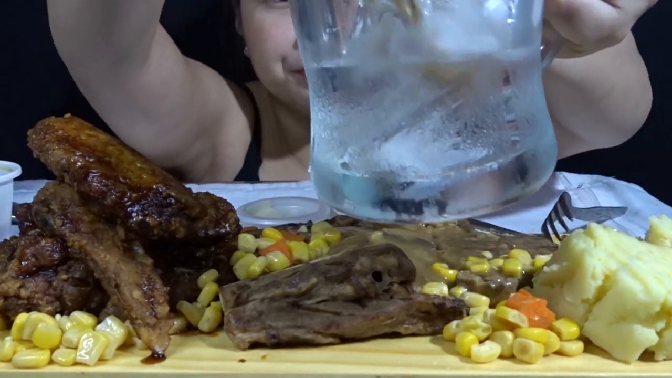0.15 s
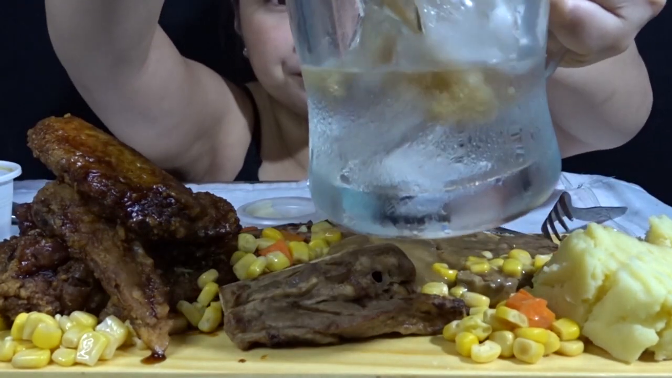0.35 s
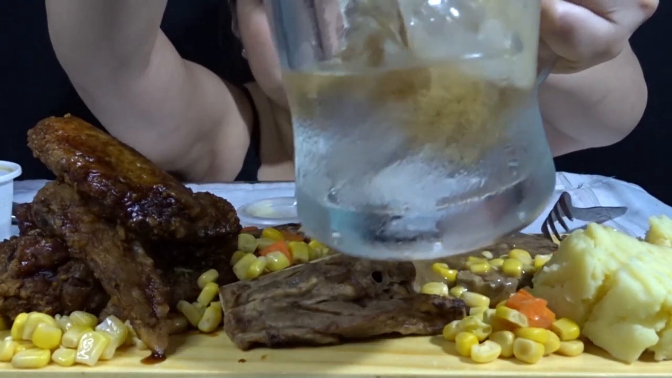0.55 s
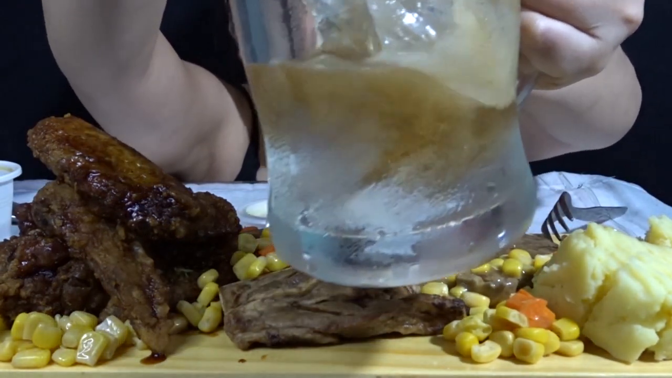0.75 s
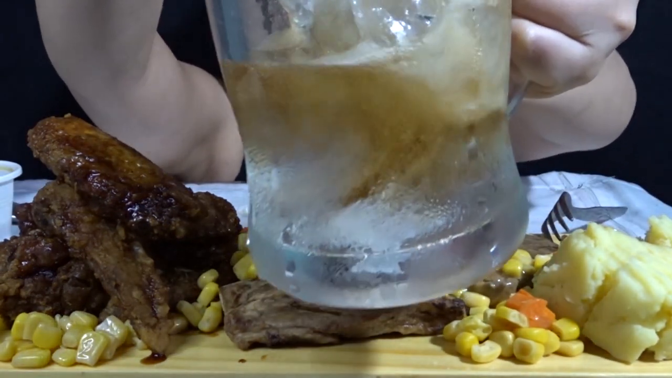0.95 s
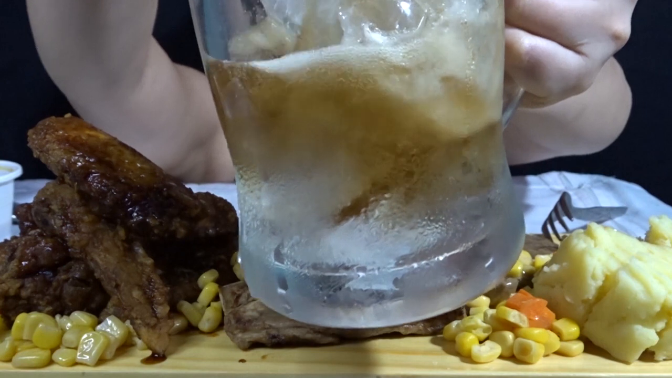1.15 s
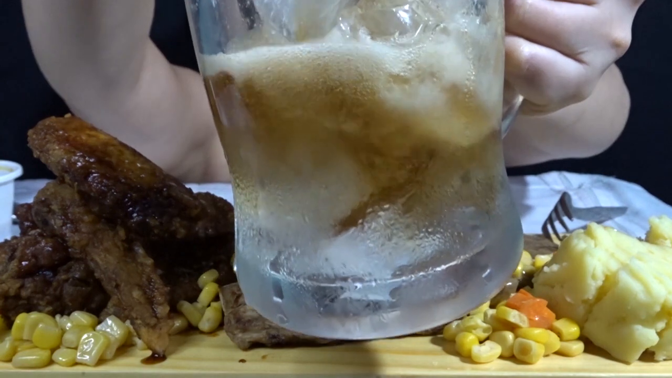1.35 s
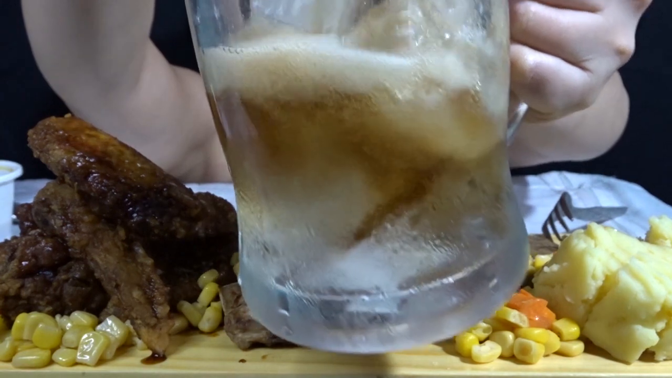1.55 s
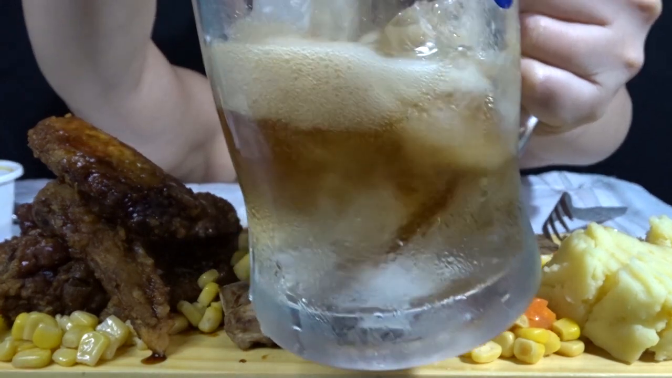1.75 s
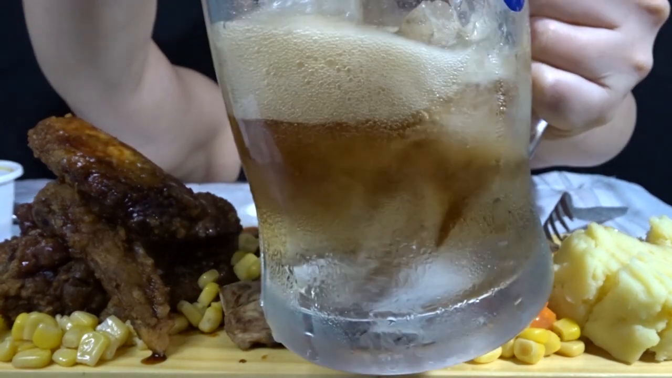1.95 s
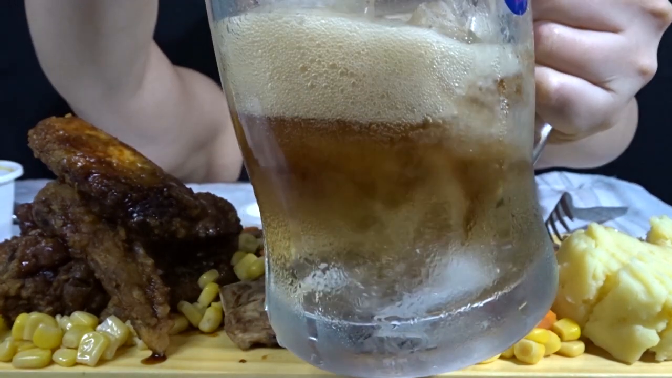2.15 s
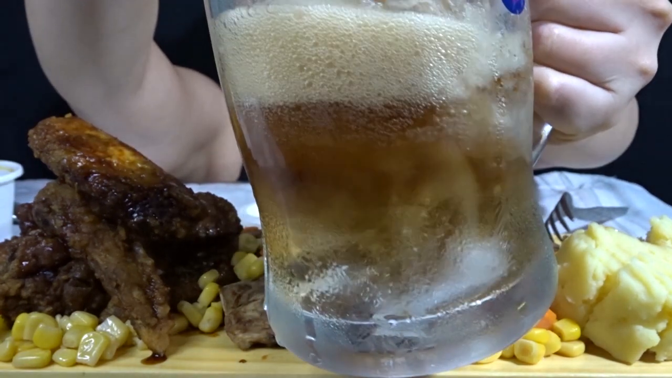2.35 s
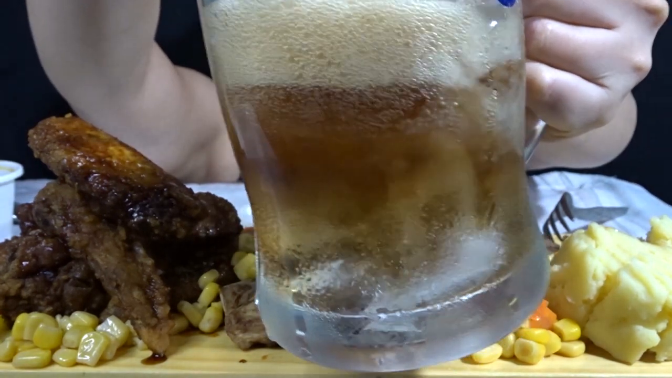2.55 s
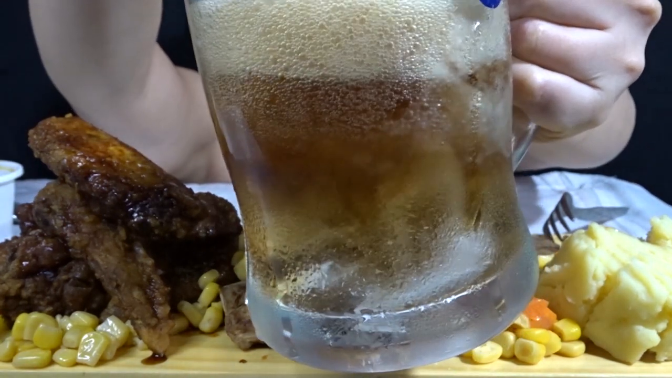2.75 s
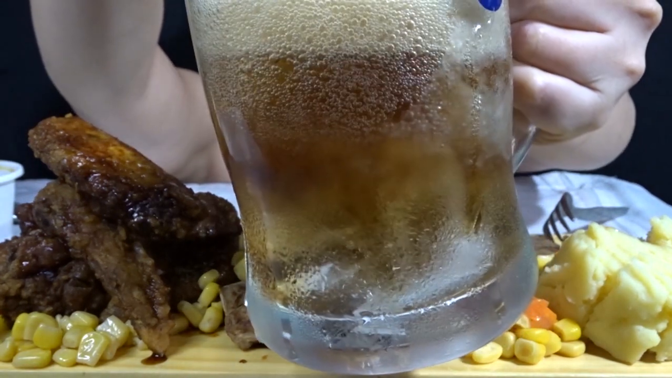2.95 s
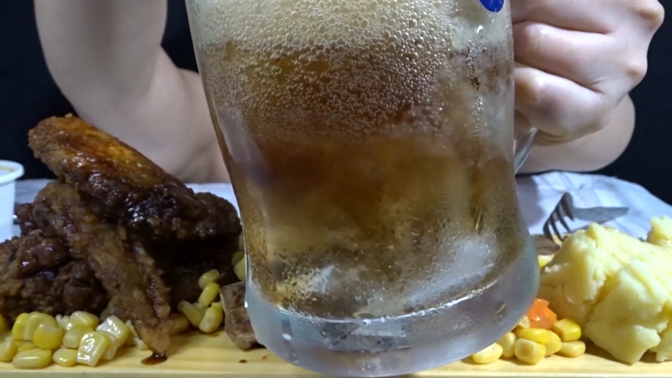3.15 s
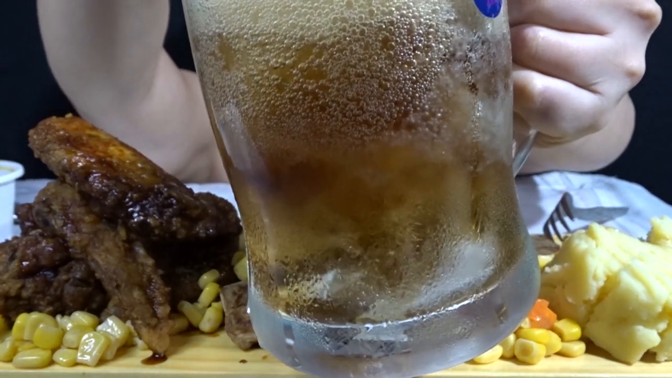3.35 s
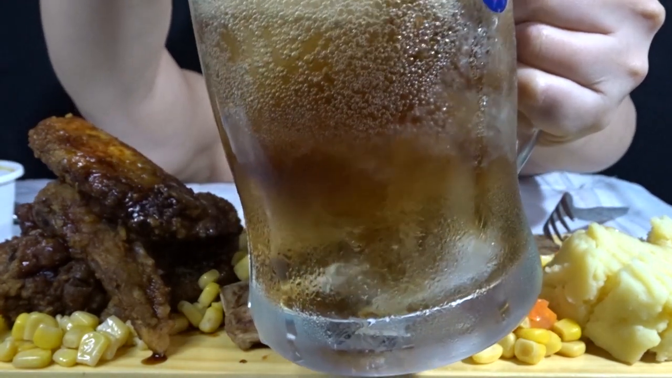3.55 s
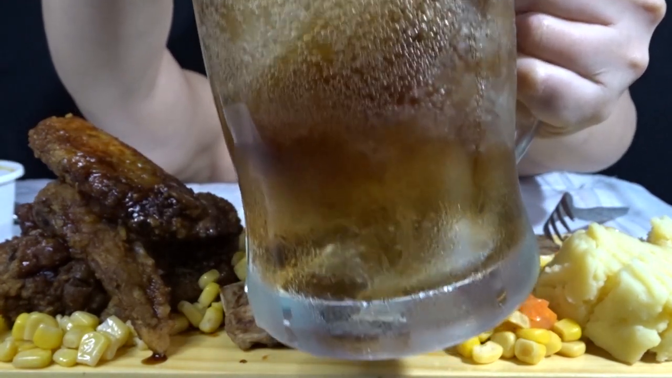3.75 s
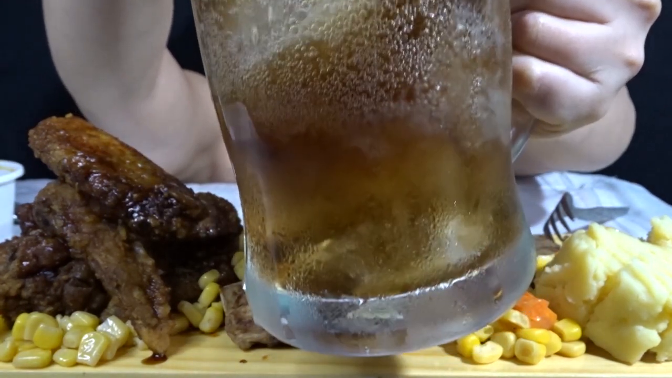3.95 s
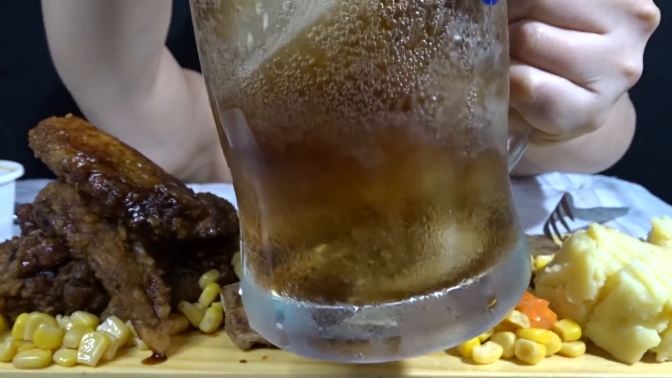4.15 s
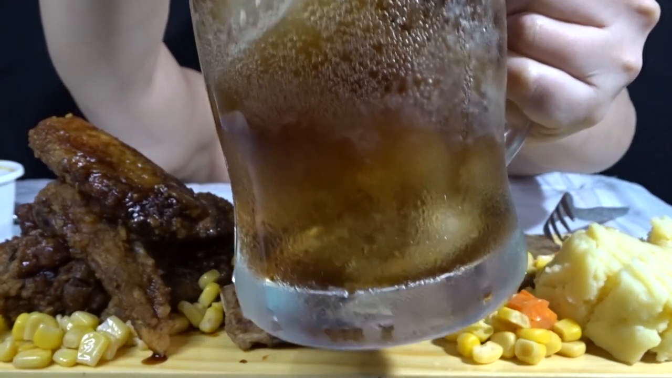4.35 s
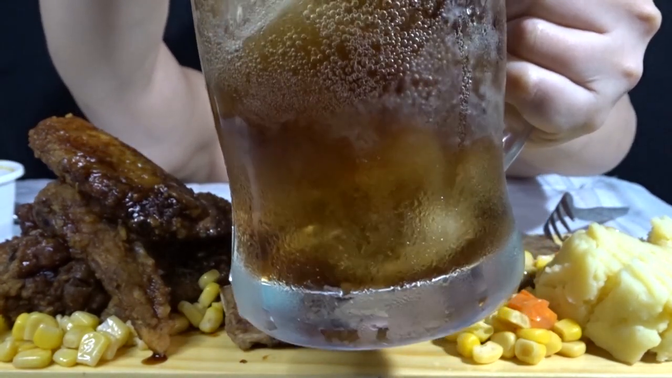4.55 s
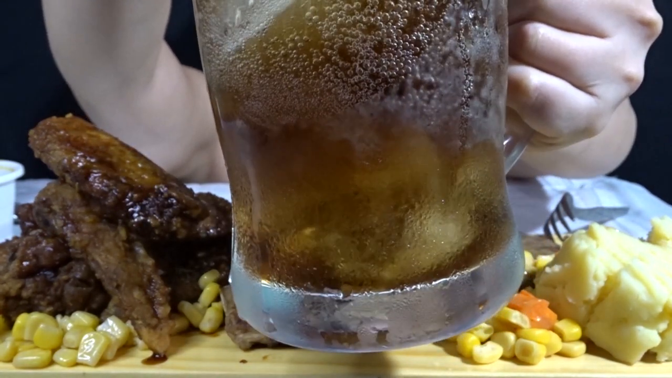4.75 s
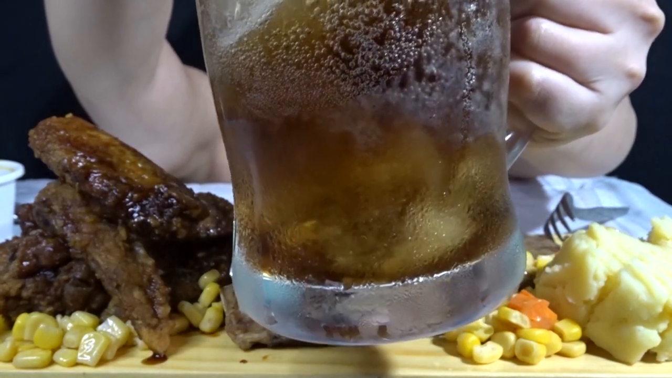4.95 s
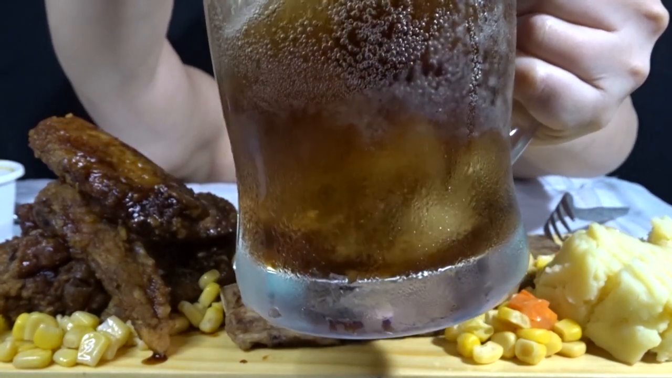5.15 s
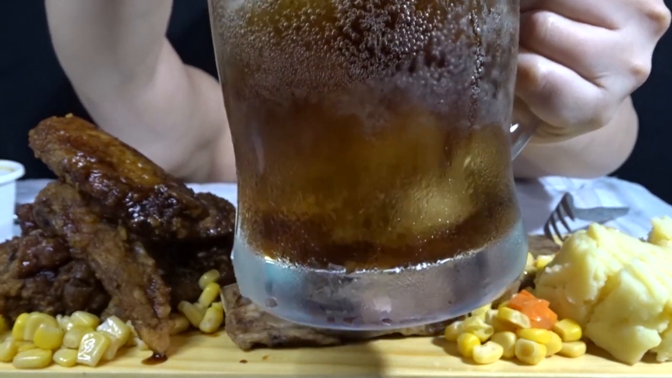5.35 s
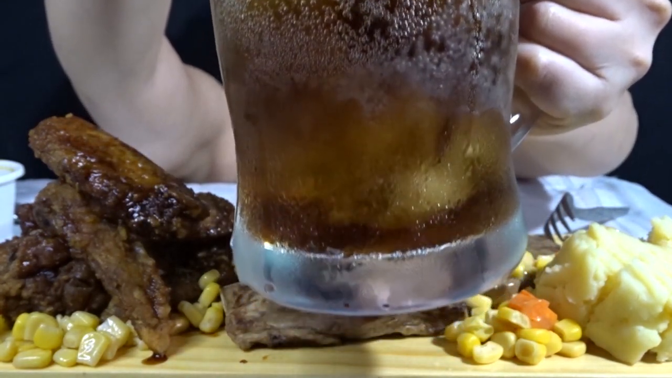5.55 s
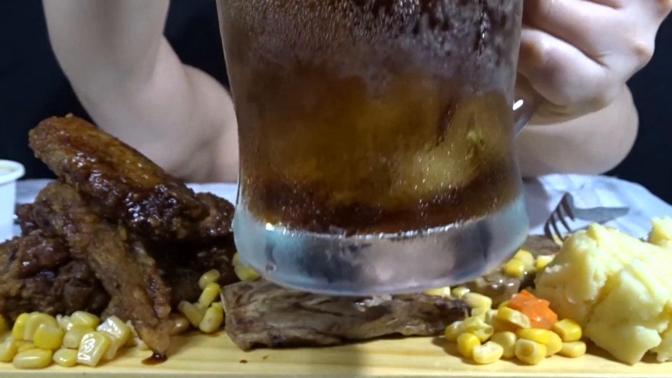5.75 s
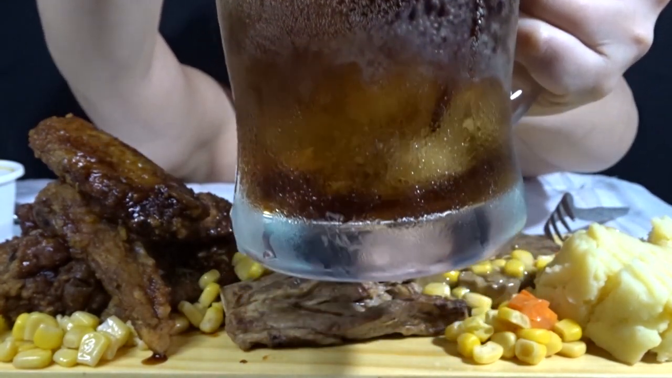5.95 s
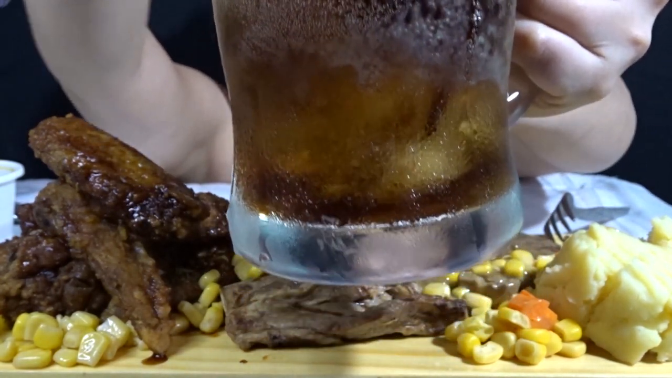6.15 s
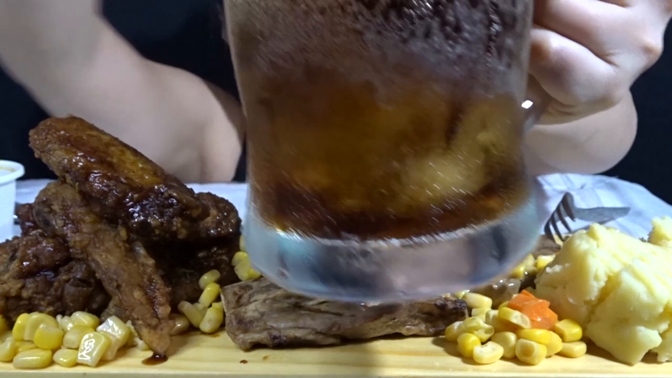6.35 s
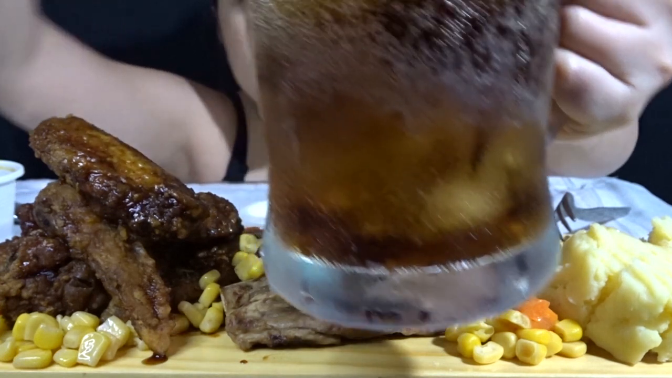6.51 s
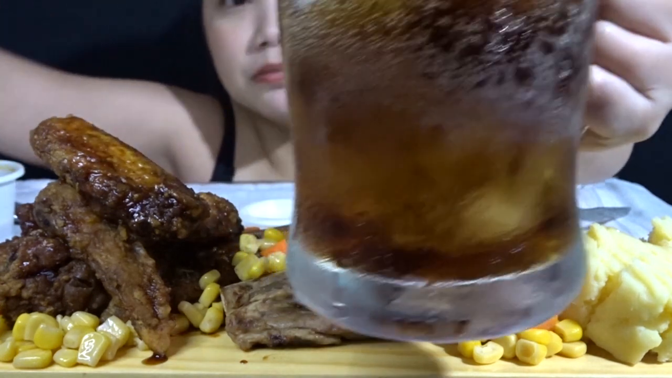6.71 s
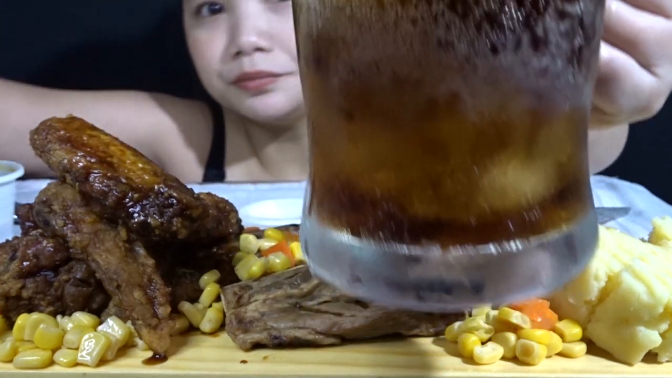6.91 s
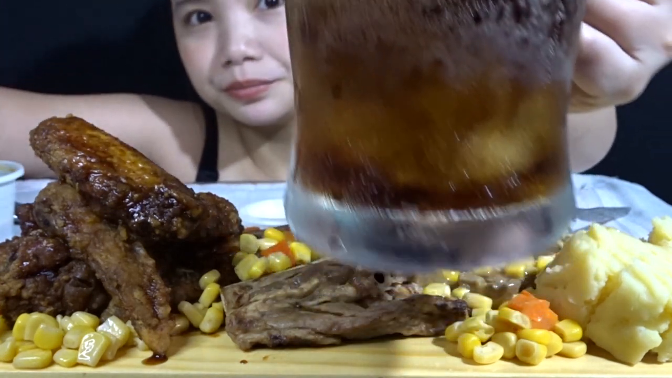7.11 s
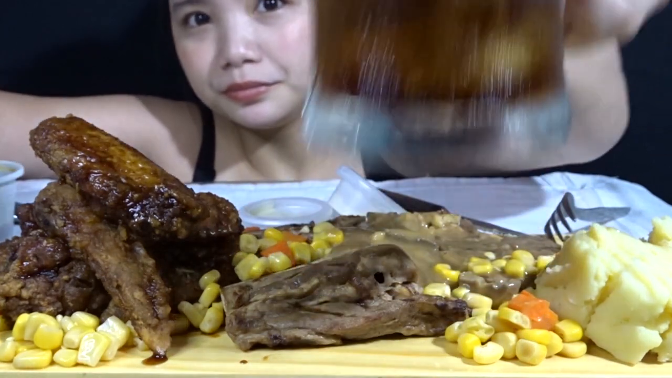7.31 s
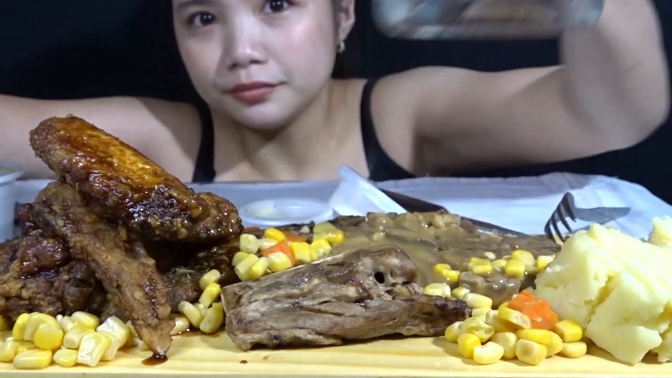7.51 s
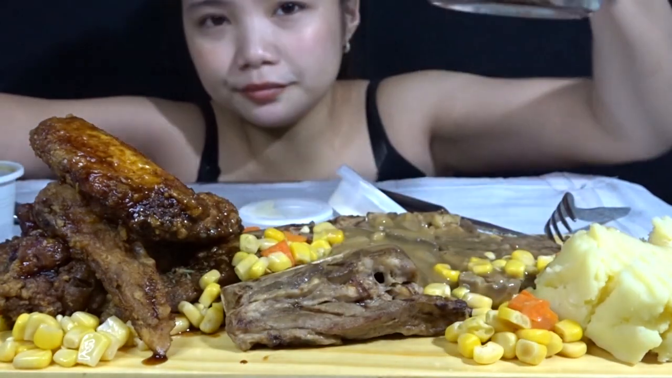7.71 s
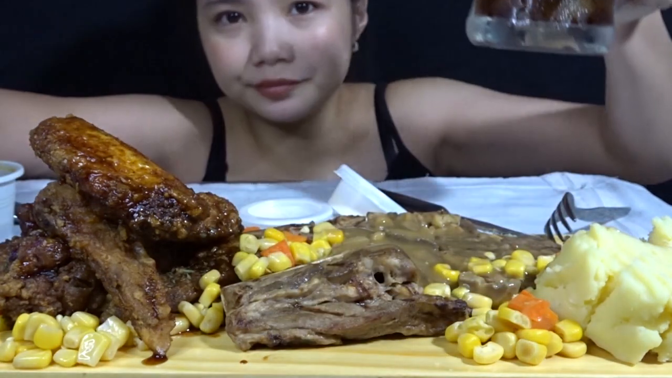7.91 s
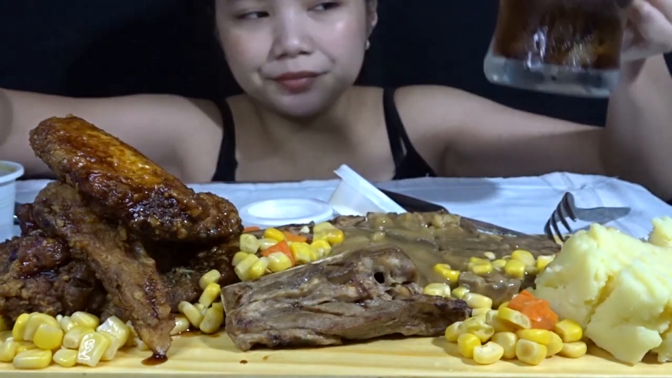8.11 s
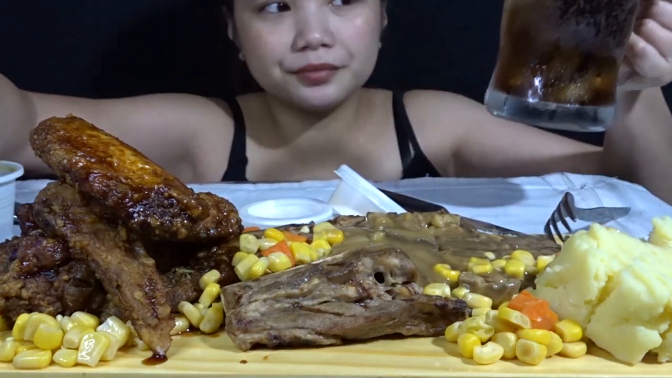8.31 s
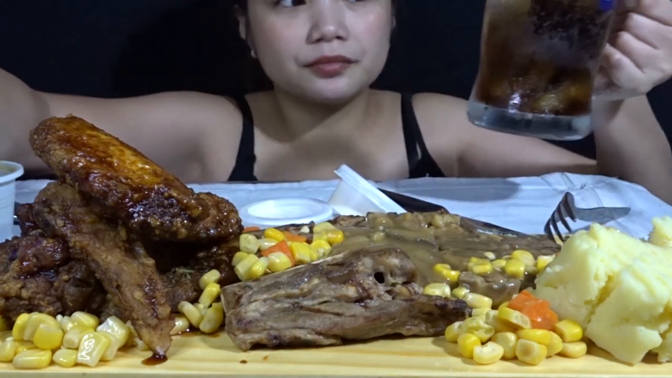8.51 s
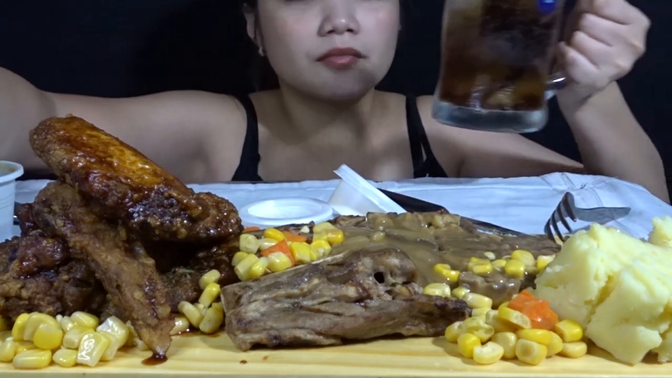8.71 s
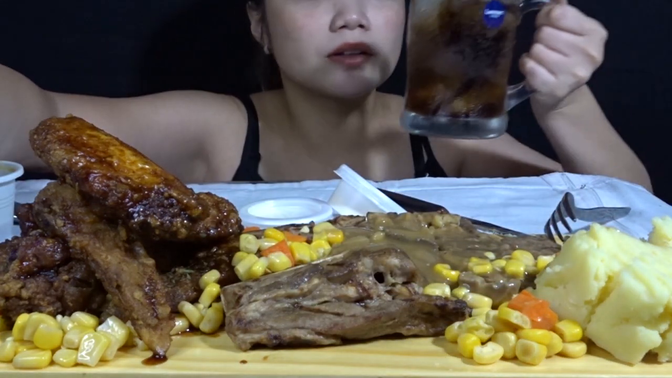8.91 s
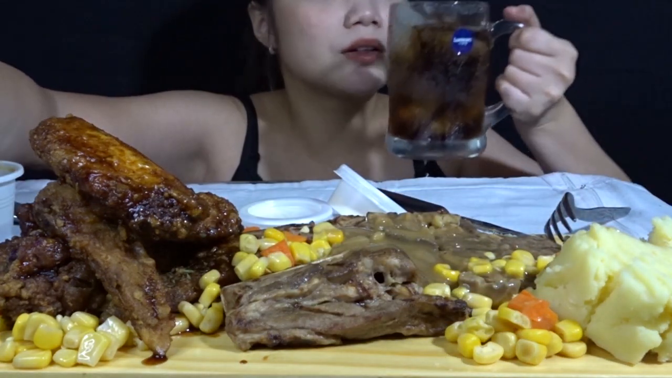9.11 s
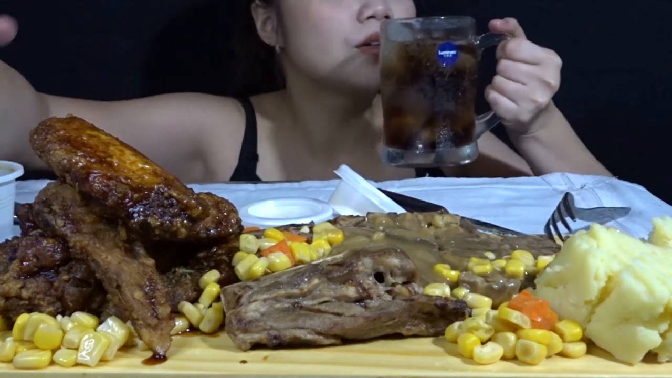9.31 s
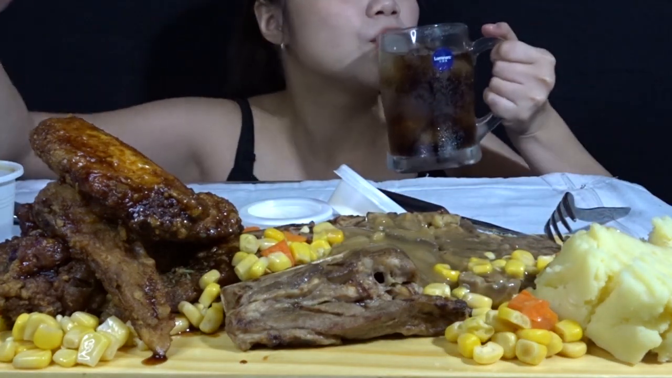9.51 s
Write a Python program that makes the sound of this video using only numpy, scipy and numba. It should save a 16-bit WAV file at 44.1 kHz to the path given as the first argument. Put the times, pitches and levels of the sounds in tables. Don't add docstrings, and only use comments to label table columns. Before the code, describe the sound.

A quiet indoor room with faint background noise, miked very close in stereo. From 0 to 0.3 s weak fizz, tiny ice ticks and first drops plink. From 0.3 to 1 s splashes, bubbly plinks and ice cracks crowd together while thin crackling foam thickens into a full, bright hiss. From 1 to 6.4 s the hiss stays dense and nearly steady, its hollow mug resonance climbing until about 4.6 s. Short glassy ice knocks come at about 1.6, 3.5, 4.5, 4.9, a strong one at 5.3, and 6.2 s, over very faint low gurgles. From 6.4 s the fizz weakens slightly; at 7.3-7.9 s ice clinks in a cluster as the mug is lifted, and the hiss falls steeply, leaving airy treble. Around 8.5-8.8 s a soft flurry of ice taps sounds, then sparse faint ticks and nearly vanished fizz until 9.7 s.

```python
import sys
import numpy as np
from scipy import signal
from scipy.fft import rfft, irfft, next_fast_len
from scipy.io import wavfile
from scipy.ndimage import map_coordinates
from numba import njit

SR = 44100
rng = np.random.default_rng(int(sys.argv[2]) if len(sys.argv) > 2 else 0)


def undo_db(level):
    steps = np.asarray(level, float) / 20
    return 10 ** steps


def wav_record(signal):
    frames = np.transpose(np.atleast_2d(signal))
    bounded = np.clip(frames, -1, 1)
    quanta = np.round(bounded * 32767).astype(np.int16)
    wavfile.write(sys.argv[1], SR, quanta)


N = 426447

# freq_hz, density_db_per_hz
ROOM_COLOUR = [(15, -76), (25, -25), (173, -27), (399, -5.5), (567, 0), (703, -2), (895, -2), (1050, -1),
               (1380, -4.5), (1570, 3), (1950, 0.5), (2630, -23.5), (7500, -27.5), (15500, -37)]
# freq_hz, likeness_0_to_1
ROOM_LIKENESS = [(60, 0.15), (130, 0.36), (290, 0.94), (640, 0.15), (1410, 0.03), (3100, 0.25),
                 (6820, 0.08), (15000, 0.083)]
# time_s, level_db
FOAM_LEVEL = [(0.0, -49.5), (0.19, -49.5), (0.32, -45), (0.46, -37), (0.67, -31.5), (0.86, -29.5),
              (2.39, -29.5), (3.61, -28.5), (4.31, -29), (5.49, -29), (6.44, -31), (7.33, -32), (7.62, -40),
              (8.0, -47.5), (8.56, -48.5), (8.74, -51.5), (8.86, -53.5), (9.67, -57)]
# time_s, lowest_resonance_hz, lowest_level_db, second_gain_db
AIR_SPACE = [(0, 1030, -75, 5), (.37, 1060, -57, 4), (.5, 1100, -35.5, 4), (.58, 1100, -44.5, 0.5),
             (.86, 1105, -42, 3), (.97, 1215, -45.5, 4.5), (1.3, 1260, -36.5, 2), (1.6, 1323, -38.5, 2.5),
             (2.7, 1520, -37.5, 5.5), (3.6, 1690, -36.5, 4.5), (4.6, 2010, -45.5, 1),
             (5.4, 1980, -44.5, 2.5), (6.3, 1990, -49.5, 0), (7.3, 1950, -42.5, 4.5), (7.9, 2080, -64, 4),
             (8.35, 2020, -66, 4.5), (8.8, 2130, -75, -0.5), (9.67, 2000, -64, 3.5)]
# freq_hz, density_db_per_hz
FOAM_COLOUR = [(410, -53), (700, -23), (776, -29), (943, -30), (1290, -12.5), (2050, -11), (2490, -1),
               (2990, -4.5), (3320, -1.5), (6590, -12), (9470, -15), (15500, -37)]
# freq_hz, density_db_per_hz
MIST_COLOUR = [(3000, -13), (5500, 9.5), (8000, -3.5), (10000, 11.5), (11000, -10)]
# freq_hz, likeness_0_to_1
DRINK_LIKENESS = [(60, 0.07), (130, 0.28), (290, 1), (640, 0.7), (1410, 0.87), (3100, 0.97), (5000, 0.77),
                  (6820, 0.74), (15000, 1)]
# start_s, peak_db, pitch_hz,
# second_pitch_hz
SPLASHES = [(.005, -50, 1980, 4400), (.14, -44, 6700, 1700), (.192, -33, 3600, 3900),
            (.231, -44, 5430, 1350), (.253, -33, 1560, 1980), (.266, -35, 1570, 2450),
            (.378, -24.5, 1180, 1850), (.3825, -25.5, 2100, 2510), (.3845, -30, 3400, 2900),
            (.494, -29, 1280, 950), (.5085, -25, 1750, 1110), (.526, -16, 4280, 1920),
            (.527, -17, 4780, 6500), (.572, -22, 3930, 3420), (.589, -27, 2170, 2520),
            (.6245, -28.5, 1320, 2300), (.706, -25, 5500, 7200), (.742, -18, 3420, 2630),
            (8.6856, -28, 3700, 4300), (8.703, -28, 3700, 4300)]
# start_s, peak_db, pitch_hz, length_ms
DROPS = [(.150, -33, 3150, 1.3), (.157, -37, 4480, 1.4), (0.17, -30, 2460, 2.3), (.188, -25, 3400, 2.3),
         (0.209, -30, 4470, 1.5), (.2235, -37, 1310, 3.9), (.28, -36, 1220, 3.3), (.305, -19, 1910, 3.4),
         (.319, -41, 1900, 4.0), (.333, -37, 1960, 5.6), (0.403, -32, 1050, 4.9), (0.425, -24, 2350, 1.5),
         (.391, -37, 1110, 8.0), (.435, -43, 1070, 9.0), (0.458, -32.5, 1025, 8.8), (0.473, -35, 1035, 9.2),
         (0.4902, -24.5, 2450, 3.6), (0.504, -27, 1540, 5.3), (.554, -19.5, 2360, 3),
         (0.624, -20, 3880, 1.0), (0.663, -18.5, 3670, 0.72), (.683, -14, 4360, .95),
         (.696, -17, 2370, 1.5), (.718, -20.5, 3800, 2.9), (.782, -20, 5040, 1.2), (.880, -18.5, 1940, 2.1),
         (.89, -19, 2490, 3), (0.957, -30.5, 1166, 7.5), (.969, -32, 1150, 6.2)]
# start_s, peak_db
CRACKS = [(.1362, -37), (.1405, -44), (.146, -46), (.1505, -40), (.157, -41), (.1687, -36), (.1861, -32),
          (.198, -38), (.207, -37), (.215, -39), (.224, -39), (.2535, -38), (.266, -38), (.281, -40),
          (.3034, -33), (.331, -39), (.3488, -40), (0.379, -32), (.3825, -35), (.393, -36), (.404, -37),
          (.4245, -33), (.458, -34), (.49, -32), (0.5105, -26), (.526, -18), (.554, -26), (.583, -25),
          (0.623, -18), (.683, -22), (.706, -26), (.742, -20), (.783, -26), (1.603, -29), (3.532, -17),
          (4.854, -19), (5.286, -26), (7.4565, -25), (7.7324, -30), (7.8121, -33), (7.8959, -32),
          (7.988, -34), (8.006, -30), (8.526, -39), (8.533, -39), (8.576, -33), (8.6093, -36),
          (8.6852, -25), (8.702, -34), (8.7075, -31), (8.9315, -44), (8.969, -46), (9.0832, -44),
          (9.128, -48), (9.3546, -40), (9.372, -46), (9.4883, -43)]
# start_s, peak_db, pitch_hz, low_push_db
FILLING_KNOCKS = [(.496, -36, 1390, -41), (1.307, -31, 2710, -60), (1.602, -27, 1230, -29),
                  (1.604, -29, 2710, -55), (1.616, -45, 1500, -36.5), (2.74, -29, 5660, -60),
                  (3.463, -20, 6610, -50), (3.531, -23, 2110, -36), (3.704, -32, 2670, -55),
                  (4.449, -18, 6240, -65), (4.495, -29.5, 1250, -53), (4.854, -28, 1990, -42),
                  (5.2572, -14, 2650, -35), (5.271, -40, 2380, -48), (5.858, -27, 2170, -60),
                  (6.202, -23, 3330, -44), (6.21, -26, 3400, -60)]
# start_s, peak_db, pitch_hz, low_push_db
CARRIED_KNOCKS = [(7.296, -27, 3420, -45), (7.341, -18, 4000, -45), (7.442, -23, 3400, -38),
                  (7.456, -19.5, 2400, -50), (7.462, -22, 2600, -60), (7.473, -41, 1890, -46),
                  (7.572, -34, 1840, -50), (7.608, -23, 3840, -45), (7.72, -41, 2610, -45),
                  (7.733, -32, 1950, -56), (7.813, -32.5, 2600, -47.5), (7.8388, -29, 3160, -63),
                  (7.891, -55, 2870, -48), (8.143, -49, 2110, -54), (8.243, -33, 3700, -70),
                  (8.5265, -40, 4570, -70), (8.532, -44, 2500, -70), (8.576, -40, 5000, -70),
                  (8.609, -37, 2600, -55), (8.655, -37, 2520, -70), (8.663, -36, 2450, -70),
                  (8.696, -33, 2500, -47.5), (8.7065, -32, 2300, -60), (8.717, -43, 2600, -52),
                  (8.735, -50, 2400, -54), (8.76, -47, 2200, -64), (8.703, -30, 2500, -64),
                  (8.869, -46, 2480, -75), (8.932, -42, 4050, -75), (8.961, -45, 2280, -68),
                  (8.975, -50, 2300, -75), (8.993, -52, 2300, -75), (9.084, -45, 2400, -73),
                  (9.088, -48, 2300, -75), (9.288, -42.5, 2260, -51), (9.355, -36.5, 2340, -52),
                  (9.364, -45, 2300, -62), (9.39, -47, 1900, -62), (9.375, -46, 2540, -60),
                  (9.488, -46, 2000, -60)]
# start_s, peak_db, pitch_hz
GLUGS = [(1.385, -55.5, 400), (1.879, -55, 500), (2.735, -54, 332), (3.9, -51, 620), (4.06, -59, 292),
         (4.13, -66, 181), (4.2, -64, 270), (4.5, -53, 480), (7.95, -64, 370), (4.65, -55, 462),
         (4.854, -62, 400), (6.209, -61, 338), (7.443, -50, 540), (7.83, -65, 150), (8.7, -54, 820),
         (8.725, -56, 800), (8.755, -55, 780), (9.42, -57, 520)]
# time_s, left_lag_samples, left_over_right_db
MUG_PLACE = [(0, 0, -0.4), (1.5, 0, 0.4), (4, 0, .3), (6, 0, .1), (7, 0.83, -0.4), (7.6, 1, -.5),
             (8.1, 2.2, -.8), (8.7, 2, 0), (9.67, 2.5, .8)]

THICKEN_S = (0.35, 0.7)
TILT_S = (0.81, 1.3)
SMOTHER_S = (1.11, 1.53)
HEAD_S = (1.5, 1.8)
STALE_S = (5.88, 7.35)
LIFT_S = (7.17, 7.91)
SETTLE_S = (7.95, 8.15)
AWAY_S = (8.56, 9.22)


def in_time(rows):
    s, *columns = np.transpose(rows)
    return [np.interp(np.arange(N) / SR, s, c) for c in columns]


def ramp(span_s):
    return np.interp(np.arange(N) / SR, span_s, [0, 1])


def at_hz(points, hz):
    points_hz, values = np.transpose(points)
    return np.interp(np.log(hz), np.log(points_hz), values)


def rms_one(x):
    return x / np.sqrt(np.mean(x ** 2) + 1e-20)


def steep(x, hz, kind):
    return signal.sosfilt(signal.butter(4, hz, kind, fs=SR, output="sos"), x)


def drift(rate_hz):
    r = np.exp(-80 * np.pi * rate_hz / SR)
    slow = signal.lfilter([1], [1, -2 * r, r * r], rng.standard_normal(N // 40 + 2002))[2000:]
    return np.interp(np.arange(N) / 40, np.arange(len(slow)), rms_one(slow))


def pair(mid, side, alike):
    alike = np.clip(alike, 0, 1)
    return np.sqrt(1 + alike) * mid + np.sqrt(1 - alike) * side * np.array([[1], [-1]])


def bursts(per_s, spread_db):
    sizes_db = spread_db * np.minimum(rng.exponential(1, (2, N)), 4)
    sizes = undo_db(sizes_db) * rng.choice([-1, 1], (2, N))
    born = rng.random((2, N)) < per_s / SR
    return rms_one(sizes * born / np.sqrt(per_s)) + 1e-18


def ring_bank(clicks, colour, pitches_hz, cycles, patchy_db):
    out = 0
    dealt = rng.integers(0, len(pitches_hz), N)
    together = drift(3.5)
    for k, hz in enumerate(pitches_hz):
        r = np.exp(-np.log(1000) * hz / cycles / SR)
        w = 2 * np.pi * hz / SR
        ringing = signal.lfilter([1, 0, -1], [1, -2 * r * np.cos(w), r * r], clicks * (dealt == k))
        mid, side = rms_one(ringing)
        level_db = at_hz(colour, hz) + patchy_db * (0.83 * together + drift(7.3))
        out = out + np.sqrt(hz) * undo_db(level_db) * pair(mid, side, at_hz(DRINK_LIKENESS, hz))
    return rms_one(out)


@njit
def moving_resonance(x, hz, width_hz, sr):
    out = np.zeros_like(x)
    for i in range(2, x.shape[1]):
        r = np.exp(-np.pi * width_hz[i] / sr)
        pull = 2 * r * np.cos(2 * np.pi * hz[i] / sr)
        for c in range(2):
            drive = (1 - r * r) / 2 * (x[c, i] - x[c, i - 2])
            out[c, i] = drive + pull * out[c, i - 1] - r * r * out[c, i - 2]
    return out


def boost(x, hz, width_hz, db):
    band = moving_resonance(x, np.full(N, hz, float), np.full(N, width_hz, float), SR)
    return x + (undo_db(db) - 1) * band


def add(out, s, db, hz, ms, ring_db, ring_s, spread):
    t, at = np.arange(4000) / SR, int(s * SR)
    u = t / (ms / 2900)
    ragged = np.interp(t, np.linspace(0, t[-1], 16), rng.standard_normal(16))
    swell = u * np.exp(1 - u)
    ring = ragged * undo_db(ring_db) * np.minimum(u, 1) * np.exp(-np.log(1000) * t / ring_s)
    below, above = 1 + spread * rng.uniform(0.48, 1.36, 2) * [-1, 1]
    sides = np.sin(2 * np.pi * hz * below * t) - np.sin(2 * np.pi * hz * above * t)
    tone = np.sin(2 * np.pi * hz * t) + 0.46 * sides
    out[at:at + 4000] += (undo_db(db) * (swell + ring) * tone)[:N - at]


def room():
    size = next_fast_len(N)
    hz = np.maximum(np.fft.rfftfreq(size, 1 / SR), 1)
    mid, side = rfft(rng.standard_normal((2, size))) * undo_db(at_hz(ROOM_COLOUR, hz))
    noise = irfft(pair(mid, side, at_hz(ROOM_LIKENESS, hz)), size)[:, :N]
    return undo_db(-58.5) * rms_one(noise)


def rumble():
    deep = steep(rng.standard_normal((2, N)), 203, "low")
    level_db = 0.5 * in_time(FOAM_LEVEL)[0] - 68.5 + 6.1 * ramp(LIFT_S) - 6.5 * ramp(AWAY_S)
    return undo_db(level_db) * rms_one(deep)


def foam_level_db():
    return in_time(FOAM_LEVEL)[0] - 7 * (1 - ramp((0.13, 0.136)))


def mug_air():
    low_hz = in_time(AIR_SPACE)[0]
    head = ramp(HEAD_S)
    bare_ratio = 2.24 + 0.22 * ramp(TILT_S)
    high_hz = low_hz * (bare_ratio * (1 - head) + 1.715 * head)
    width_hz = 209 + 0.31 * (low_hz - 1100) - 170 * ramp(LIFT_S)
    return low_hz, high_hz, width_hz


def foam(surge):
    low_hz, high_hz, width_hz = mug_air()
    high_db = in_time(AIR_SPACE)[2]
    head, away = ramp(HEAD_S), ramp(AWAY_S)
    tilt = ramp((TILT_S[0], SMOTHER_S[0])) - ramp(SMOTHER_S)
    across_hz = 3420 + (5360 - 3420) * ramp((3, 8.1)) + 260 * tilt
    across_db = 7 * ramp(THICKEN_S) - 6 * ramp(SMOTHER_S)
    across_db = across_db + 12.5 * ramp(LIFT_S) - 5.5 * ramp(SETTLE_S) - 9.5 * away
    core_db = 5 * ramp(THICKEN_S) * (1 - ramp((1.05, 1.4)))
    valley_db = -2.5 * (1 - 0.99 * head)
    resting_db = 6 * ramp(SETTLE_S) * (1 - away)

    per_s = np.interp(np.arange(N) / SR, THICKEN_S, [3200, 17000])
    clicks = bursts(per_s, spread_db=1.0) * surge
    x = ring_bank(clicks, FOAM_COLOUR, np.geomspace(900, 10500, 18), cycles=12.2, patchy_db=0.44)
    x = boost(x, high_hz, 1.1 * width_hz, high_db)
    x = boost(x, high_hz, 120, core_db)
    x = boost(x, 1.62 * low_hz * (1 - 0.13 * head), 500, valley_db)
    x = boost(x, across_hz, 1.45 * width_hz * (across_hz / 3500) ** 3, across_db)
    x = boost(x, 3500, 350, resting_db)
    return steep(undo_db(foam_level_db() - 1.0) * x, 10670, "low")


def air_column():
    low_hz, _, width_hz = mug_air()
    low_db = in_time(AIR_SPACE)[1]
    splash = bursts(5000, spread_db=2.5) * undo_db(0.84 * drift(25)) / np.sqrt(width_hz)
    column = moving_resonance(splash, low_hz, width_hz, SR)
    column = moving_resonance(column, low_hz, 8.8 * width_hz, SR)
    return undo_db(low_db) * rms_one(pair(column[0], column[1], 0.97))


def mist(surge, puffs):
    _, high_hz, width_hz = mug_air()
    level_db = foam_level_db() - 12 - 9 * ramp(STALE_S) + 18 * ramp(LIFT_S)
    level_db = level_db - 0.5 * ramp((SETTLE_S[1], AWAY_S[0]))
    clicks = bursts(16000, spread_db=-0.5) * surge
    x = ring_bank(clicks, MIST_COLOUR, np.geomspace(5500, 10800, 7), cycles=8.1, patchy_db=-0.15)
    x = x + 0.74 * moving_resonance(x, 3.24 * high_hz, 2.9 * width_hz, SR)
    return undo_db(level_db) * steep(steep(x, 2300, "high"), 9550, "low") * puffs


def spray(surge, puffs):
    level_db = 0.52 * foam_level_db() - 27.5 - 1.6 * ramp(STALE_S) + 6.8 * ramp(LIFT_S)
    level_db = level_db - 5.8 * ramp((SETTLE_S[1], AWAY_S[0]))
    treble = steep(bursts(9000, spread_db=1.0) * surge, 11500, "high")
    mid, side = rms_one(treble * puffs * undo_db(0.81 * drift(5)))
    return undo_db(level_db) * signal.lfilter([0.25, 0.5, 0.25], [1], pair(mid, side, 0.43))


def fizz():
    surge = undo_db(0.17 * drift(42))
    puffs = undo_db(0.7 * drift(14))
    in_mug = steep(foam(surge) + air_column(), 883, "high")
    return in_mug, mist(surge, puffs) + spray(surge, puffs)


def drops():
    out = np.zeros(N)
    for s, db, hz, second_hz in SPLASHES:
        add(out, s, db, hz, 5200 / hz, -19, 0.06, 0.08)
        add(out, s, db - 3, second_hz, 5200 / hz, -19, 0.06, 0.08)
    for s, db, hz, ms in DROPS:
        add(out, s, db, hz, ms, -19, 0.09, 0.06)
        add(out, s, db - 13.5, 1.9 * hz, ms, -19, 0.09, 0.06)
    return steep(out, 690, "high")


def cracks():
    tick_ms = 0.82
    out, t = np.zeros(N + 400), np.arange(400) / SR
    for s, db in CRACKS:
        at = int(s * SR)
        out[at:at + 400] += undo_db(db) * rng.standard_normal(400) * np.exp(-1000 * t / tick_ms)
    band = steep(steep(out[:N], 1100, "high"), 9540, "low")
    return signal.lfilter([0.5, 0.5], [1], band)


def gurgle():
    colour = [(240, -27), (450, 0.0), (800, 10.0)]      # freq_hz, density_db_per_hz
    clicks = bursts(1500, spread_db=-1.0)
    lumps = ring_bank(clicks, colour, np.geomspace(260, 850, 7), cycles=18.0, patchy_db=3.5)
    stale = ramp((STALE_S[0] - 0.2, STALE_S[1] - 0.3))
    level_db = -70 + 13.5 * ramp((2.64, 2.98)) - 15 * stale
    return steep(steep(undo_db(level_db) * lumps, 236, "high"), 990, "low")


def knocks():
    out, push = np.zeros((2, N))
    for s, db, hz, push_db in FILLING_KNOCKS + CARRIED_KNOCKS:
        ms = min(2.4 * (2450 / hz) ** 2.2, 3.1)
        add(out, s, db, hz, ms, -21, 0.04, 0.07)
        add(out, s, db - 5.5 * ms, 0.58 * hz, ms, -21, 0.04, 0.09)
        add(push, s, push_db, 792, 3.9, -18, 0.04, 0.26)
        add(push, s, push_db, 1500, 1, -30, 0.02, 0.4)
    return steep(out, 690, "high") + steep(push, 400, "high")


def glugs():
    low = np.zeros(N)
    for s, db, hz in GLUGS:
        twins = rng.uniform([0, 0.8], [0.035, 1.25], (2, 2)) - [[0.0046, 0.0065], [-0.01, 0]]
        for late_s, tune in twins:
            add(low, s + late_s - 0.015, db - 4.0, tune * hz, 6200 / hz, -10, 0.08, 0.26)
    return steep(low, 140, "high")


def echoes(x):
    t = np.arange(6000) / SR
    decay = np.exp(-np.log(1000) * t / 0.22) * (t > 0.002)
    tails = rng.standard_normal((2, 6000)) * decay
    return undo_db(-34.0) * signal.oaconvolve(x[None], tails, axes=1)[:, :N]


def scene():
    lag_samples, pan_db = in_time(MUG_PLACE)
    hits = drops() + cracks() + knocks() + glugs()
    in_mug, above_mug = fizz()
    left, right = in_mug + gurgle() + hits
    left = map_coordinates(left, [np.arange(N) - lag_samples], order=3)
    mug = np.array([left * undo_db(pan_db / 2), right * undo_db(-pan_db / 2)])
    return mug + above_mug + echoes(hits) + room() + rumble()


def roll_off(x):
    return signal.sosfilt(signal.butter(12, 15815, fs=SR, output="sos"), x)


def record(dry):
    cut = signal.sosfilt(signal.cheby2(12, 60, 16250, fs=SR, output="sos"), dry)
    return roll_off(cut)


dry = scene()
out = record(dry)
wav_record(out)
```